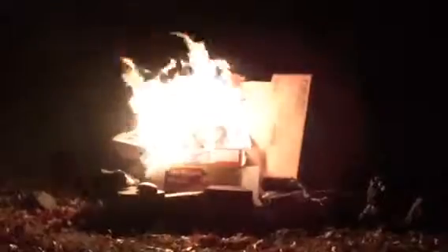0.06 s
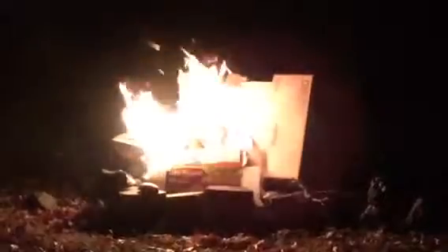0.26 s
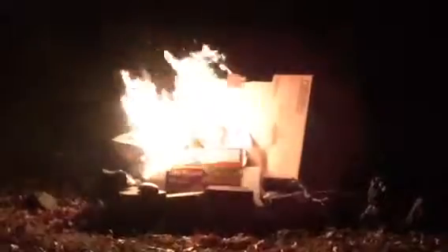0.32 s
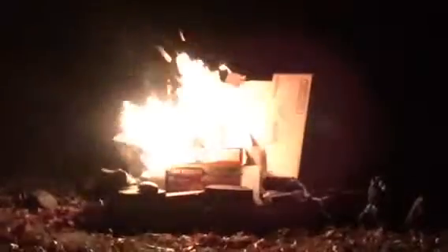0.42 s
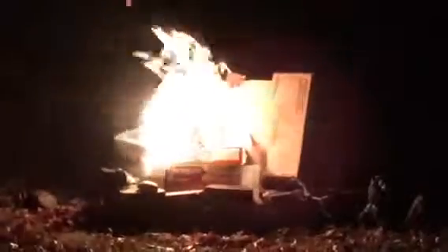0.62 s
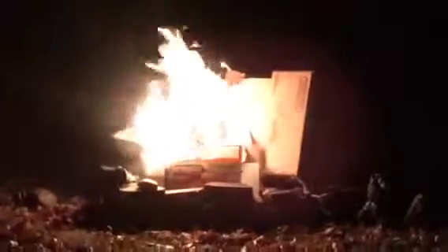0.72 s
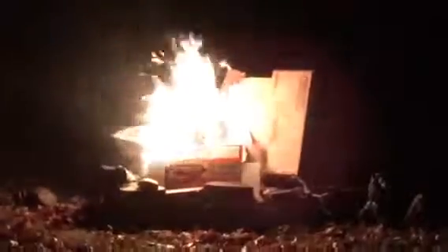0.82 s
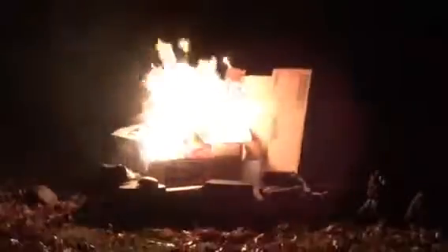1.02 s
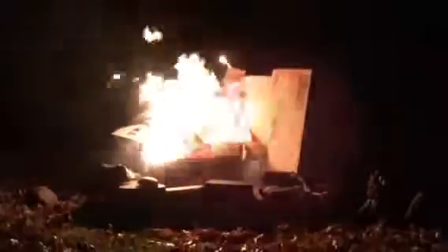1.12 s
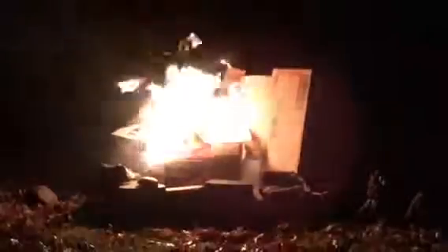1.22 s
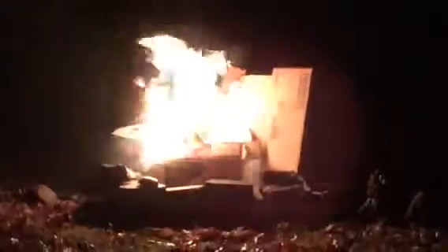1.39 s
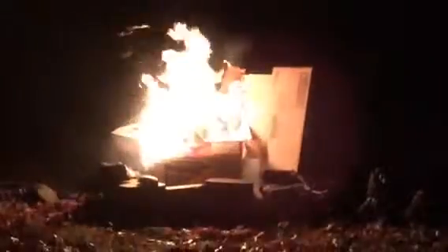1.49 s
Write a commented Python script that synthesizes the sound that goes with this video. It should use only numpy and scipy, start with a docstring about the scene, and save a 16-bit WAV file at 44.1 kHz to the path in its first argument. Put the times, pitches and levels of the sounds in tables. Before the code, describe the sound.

Burning wood crackles and snaps over deep, fluttering flame rumble in the open night air

```python
"""Flames of a bonfire of boards flap at night: low windowed tones with noisy edges, over band-noise rumble.
Wood pops: two decaying rings, a noise snap and a tail; fine crackle comes in spells of tiny noise bursts.
Pops and crackle return once, delayed, from the ground. Filtered noise gives a swelling roar of draught
and the steady hiss of fire and night air. A small microphone, a few metres away, thins the bass."""
import sys
import numpy as np
from scipy import signal
from scipy.fft import rfft, irfft
from scipy.io import wavfile
from scipy.ndimage import uniform_filter1d, map_coordinates

SR = 44100
rng = np.random.default_rng(int(sys.argv[2]) if len(sys.argv) > 2 else 0)


def natural_amplitude(level_db):
    """Convert a level in decibels to a linear amplitude factor, elementwise."""
    exponent = np.asarray(level_db, float) / 20
    return 10 ** exponent


def to_wav(s):
    """Save 16-bit WAV."""
    ch = np.atleast_2d(s).T  # columns
    pcm = np.round(np.clip(ch, -1, 1) * 32767)  # PCM
    wavfile.write(sys.argv[1], SR, pcm.astype(np.int16))


N = 68355


def unit(x):
    """Scale to rms 1."""
    return x / np.sqrt(np.mean(x ** 2))


def colour(x, points):
    """Filter by (frequency [Hz], gain [dB]) points joined on a log-frequency axis."""
    hz, db = np.array(points, float).T
    f_hz = np.maximum(np.arange(N // 2 + 1) * SR / N, 1)
    gain_db = np.interp(np.log(f_hz), np.log(hz), db)
    return irfft(rfft(x) * natural_amplitude(gain_db), N)


def coloured_noise(points):
    """Gaussian noise shaped by points, rms 1."""
    return unit(colour(rng.standard_normal(N), points))


def curve(rows):
    """Gain over time from (time [s], level [dB]) rows."""
    s, db = np.array(rows, float).T
    return natural_amplitude(np.interp(np.arange(N) / SR, s, db))


def walk(rate_hz):
    """Random levels drawn at rate_hz, smoothed twice over one hold."""
    hold = int(SR / rate_hz)
    steps = np.repeat(rng.standard_normal(N // hold + 1), hold)
    smooth = uniform_filter1d(uniform_filter1d(steps, hold), hold)
    return 0.75 * smooth[:N]


def bump(t, rise, fall):
    """Gaussian rise to 1 at t = 0, Gaussian fall; rise and fall are sigmas in the unit of t."""
    return np.exp(-.5 * (t / np.where(t < 0, rise, fall)) ** 2)


# flame puffs: (centre [s], bell peak [dB], pitch [Hz], full width at half height [ms],
#               edge rms re bell peak [dB])
PUFFS = [(0.086, -50.5, 146, 10.5, -25), (0.1181, -43.5, 112.0, 7.7, -20), (0.177, -52, 95, 8.5, -36),
         (0.214, -36.5, 75, 13.2, -33), (0.2535, -43.5, 77, 8.5, -26), (0.2983, -35, 93.0, 7.2, -35),
         (0.3224, -46, 82, 7.6, -26), (0.336, -39.5, 78, 9.7, -26), (0.3634, -33.5, 98, 7.6, -25),
         (0.3913, -60, 77.4, 8.9, -11), (0.42, -46, 89, 10, -7), (0.431, -24.5, 126.7, 13.3, -15),
         (0.46, -35, 169, 11.4, -8.5), (0.4856, -41, 126, 17, -13.5), (0.494, -39.5, 172, 5, -26),
         (0.528, -31.0, 127, 5.8, -19), (0.542, -39, 91, 12, -21.5), (0.582, -34.5, 108.3, 8, -23),
         (0.5959, -28.5, 125, 10.4, -24.5), (0.6412, -34.5, 108, 4.2, -19), (0.67, -39, 162, 12.8, -19),
         (0.6771, -29.5, 130.0, 10.4, -29), (0.69, -42.5, 260, 4.5, 3), (0.6991, -38.5, 131, 18.6, -20.5),
         (0.73, -37.5, 100, 10.4, -18), (0.7535, -32.5, 94.3, 20, -40), (0.8393, -45, 155, 13, -42),
         (0.9474, -45.5, 74, 11.6, -14.5), (0.9649, -32.5, 127, 5.4, -15.5), (0.9914, -45.0, 104, 7.6, -33),
         (1.0182, -37.0, 93, 13.4, -35), (1.0681, -34, 118, 7.4, -24.5), (1.089, -47, 121, 4, -19),
         (1.113, -51, 127, 14, -27), (1.162, -36.5, 116, 6.4, -21.0), (1.174, -43, 142, 10, -19),
         (1.2005, -44, 111.0, 6.3, -24), (1.239, -30, 103, 8.4, -31), (1.261, -28.5, 111, 5, -18.5),
         (1.276, -36.5, 84, 13.7, -26), (1.41, -49, 90, 7.8, -26), (1.441, -47.5, 75, 16.7, -36),
         (1.466, -44, 93.0, 8.4, -23.5), (1.4981, -48.0, 69.0, 29, -24.5)]
# puff edge spectrum: (frequency [Hz], gain [dB])
EDGE_COLOUR = [(150, -39), (230, 4), (400, -9.5), (600, -24.5), (1200, -86)]


def puffs():
    """Each flap is a brief low pressure tone plus rougher edge noise under one Gaussian bell."""
    t, out = np.arange(N) / SR, 0
    edge = coloured_noise(EDGE_COLOUR)
    phases = rng.random(len(PUFFS))  # cycles
    for (centre_s, db, hz, width_ms, edge_db), phase in zip(PUFFS, phases):
        u = t - centre_s
        bell = np.exp(-np.log(16) * (u * 1000 / width_ms) ** 2)
        tone = np.cos(2 * np.pi * (hz * u + phase))
        out = out + natural_amplitude(db) * bell * (tone + natural_amplitude(edge_db) * edge)
    return out


# rumble level before the random swing: (time [s], level [dB])
RUMBLE = [(0, -55.5), (.1, -63), (.14, -60.5), (.19, -58.5), (.4, -48.5), (.47, -45.5), (.6, -54),
          (.74, -48), (.79, -55.5), (.87, -58), (.93, -54), (1.13, -52), (1.2, -50.5), (1.29, -58.5),
          (1.33, -63.5), (1.38, -72), (1.42, -64), (1.55, -56.5)]
# rumble spectrum: (frequency [Hz], gain [dB])
RUMBLE_COLOUR = [(12, -38), (30, -15), (60, 9), (100, -3), (150, -2.5), (210, -9), (300, -32.5),
                 (450, -60.5)]


def rumble():
    """Low band noise follows a level curve with a random swing."""
    swing_db = 1.6 * walk(18.7)
    return coloured_noise(RUMBLE_COLOUR) * curve(RUMBLE) * natural_amplitude(swing_db)


# wood pops: (centre [s], first ring peak [dB], first ring pitch [Hz], first ring fall sigma [ms],
#             second ring re first [dB], snap noise re first ring [dB])
POPS = [(0.0276, -54.5, 1540, 0.81, -20, -14), (0.339, -62.5, 3950, 0.17, -1, 10.5),
        (0.4823, -49.5, 2670, 0.19, -1, -12.5), (.6915, -67, 2320, .8, -10, 1),
        (0.7186, -47, 1640, 1.9, -14, -6), (.7250, -47, 1580, 1.5, -14, -11),
        (.7337, -53, 2180, 1.1, -3, -5), (.7572, -57, 2320, 0.47, -6, 1),
        (.7927, -49.5, 990, 0.81, -16, -3), (0.8024, -38, 2057, 0.45, -7.5, -20),
        (.8325, -36.5, 2420, 0.45, -12.5, -17), (0.841, -50.5, 3020, 0.65, -10, -11),
        (0.8505, -52, 2510, 1.2, -12, -15), (.8713, -40, 1920, 0.51, -14, -11),
        (.8989, -63, 2120, .9, -8, -16), (0.9078, -39, 2010, 0.54, -1, -8.5),
        (0.917, -48, 2200, 0.41, -8, -5), (0.9194, -53, 1610, 1.9, -10, -16),
        (0.929, -51, 2070, 0.94, -19, -18), (0.932, -59, 2280, .7, -13, -17),
        (0.9592, -55.5, 2400, 0.32, -6, -0.5), (.9715, -64.5, 3070, .6, -10, 5.5),
        (.978, -61, 5930, 1.5, -20, -18), (1.0834, -66, 2400, 0.53, 4, -1),
        (1.0900, -66, 2000, .9, -10, -17), (1.1397, -39, 2500, 0.32, -13, -10.5),
        (1.2854, -58.5, 2310, .8, -2, -5), (1.2986, -41, 2165, 0.85, -2.5, -8.5),
        (1.3139, -55, 1600, 0.49, -12, -11), (1.406, -64, 2040, 1.6, -13, -20)]
# snap spectrum: (frequency [Hz], gain [dB])
SNAP_COLOUR = [(2500, -5.5), (4000, 0), (7000, -3), (11000, -6.5), (15000, -10.5), (16000, -54)]


def pops():
    """Each pop is two short rings, a broadband snap and an exponential tail of splinter noise."""
    rise_ms, overtone_fall_ms, snap_rise_ms, snap_fall_ms = .4, 0.27, 0.33, 0.66  # sigmas
    overtone_ratio = 1.7
    tail_db, tail_ms = -19, 4  # tail: re first ring, time constant
    t, out = np.arange(N) / SR, 0
    snap_noise = coloured_noise(SNAP_COLOUR)
    splinters = coloured_noise(CRACKLE_COLOUR)
    phases = rng.random((len(POPS), 2))  # cycles
    for (centre_s, db, hz, fall_ms, second_db, snap_db), (p, q) in zip(POPS, phases):
        u = t - centre_s
        u_ms = u * 1000
        first = np.cos(2 * np.pi * (hz * u + p)) * bump(u_ms, rise_ms, fall_ms)
        second = np.cos(2 * np.pi * (overtone_ratio * hz * u + q)) * bump(u_ms, rise_ms, overtone_fall_ms)
        tail = (u > 0) * np.exp(-np.abs(u_ms) / tail_ms) * splinters
        snap = snap_noise * bump(u_ms, snap_rise_ms, snap_fall_ms)
        out = out + natural_amplitude(db) * (first + natural_amplitude(second_db) * second + natural_amplitude(tail_db) * tail + natural_amplitude(snap_db) * snap)
    return out


# crackle spells: (start [s], length [s], level [dB])
SPELLS = [(.0, 0.037, -76.5), (.69, 0.059, -76.5), (0.723, 0.02, -65), (0.747, .03, -66.5),
          (0.79, 0.026, -64.5), (0.825, 0.043, -65), (0.871, 0.014, -63), (0.894, 0.021, -61),
          (0.908, 0.0088, -53), (0.922, 0.012, -56.5), (0.934, 0.036, -72.5), (1.076, 0.019, -74),
          (1.135, 0.013, -70), (1.258, 0.067, -74), (1.392, 0.091, -68.5)]
# crackle spectrum, shared by the pop tails: (frequency [Hz], gain [dB])
CRACKLE_COLOUR = [(600, -24.5), (1200, -4), (2100, -2), (3200, -6), (5000, -15), (9000, -21.5),
                  (15000, -19), (16000, -64)]


def crackle():
    """Dense 30-sample noise bursts of uneven size, gated into spells."""
    grains_per_s, spread_db, fade_s = 2500, 2, .005
    t = np.arange(N) / SR
    size_db = spread_db * np.minimum(rng.exponential(size=N), 4)
    clicks = (rng.random(N) < grains_per_s / SR) * natural_amplitude(size_db)
    grains = uniform_filter1d(clicks, size=30) * rng.standard_normal(N)
    spells = 0
    for start_s, length_s, db in SPELLS:
        inside_s = np.minimum(t - start_s, start_s + length_s - t)
        spells = spells + natural_amplitude(db) * np.clip(inside_s / fade_s + .5, 0, 1)
    return unit(colour(grains, CRACKLE_COLOUR)) * spells


def ground_echo(wood):
    """The ground mirrors the wood sounds once, later and weaker."""
    delay_s, echo_db = .0043, -13
    return natural_amplitude(echo_db) * map_coordinates(wood, [np.arange(N) - delay_s * SR], mode="constant")


# draught roar level before the random swing: (time [s], level [dB])
ROAR = [(0, -67), (.08, -66.5), (.15, -68), (.24, -63.5), (.4, -66.5), (.55, -67.5), (.64, -67.5),
        (.8, -68), (.95, -69.5), (1.1, -69), (1.25, -66.5), (1.35, -68.5), (1.55, -70)]
# roar spectrum: (frequency [Hz], gain [dB])
ROAR_COLOUR = [(150, -19), (260, 1.5), (400, -1), (700, -3), (1100, -5.5), (1600, -10), (2200, -18),
               (4000, -48)]


def roar():
    """Soft draught: mid-low noise follows a level curve with a random swing."""
    swing_db = 1.64 * walk(25.2)
    return coloured_noise(ROAR_COLOUR) * curve(ROAR) * natural_amplitude(swing_db)


# hiss spectrum: (frequency [Hz], gain [dB])
HISS_COLOUR = [(800, -20), (1500, -2), (2660, -1), (3500, -2), (8000, -8), (15000, -12), (16000, -24)]


def hiss():
    """Steady thin noise of the fire and night air."""
    hiss_rms_db = -74.5
    return coloured_noise(HISS_COLOUR) * natural_amplitude(hiss_rms_db)


def scene():
    """Sum flames, wood with its ground echo, roar and hiss into one channel."""
    wood = pops() + crackle()
    flames = puffs() + rumble()
    return (flames + wood + ground_echo(wood) + roar() + hiss())[None]


def top_cut(x):
    """Nothing passes above the cut-off."""
    return signal.sosfilt(signal.butter(12, 16030, fs=SR, output="sos"), x)


def record(dry):
    """The small microphone loses the deepest bass: second-order high-pass."""
    mic_low_hz = 33.4
    high_pass = signal.butter(2, mic_low_hz, "high", fs=SR, output="sos")
    thin = signal.sosfilt(high_pass, dry)
    return top_cut(thin)


dry = scene()
out = record(dry)
to_wav(out)
```